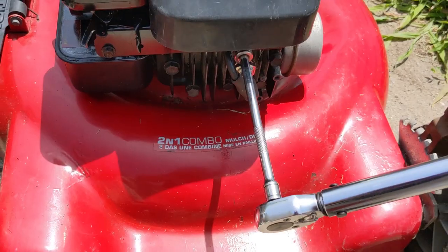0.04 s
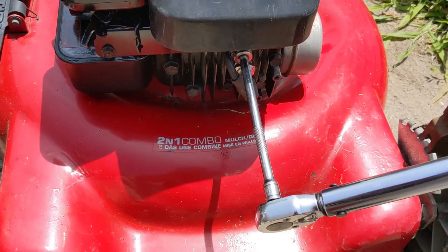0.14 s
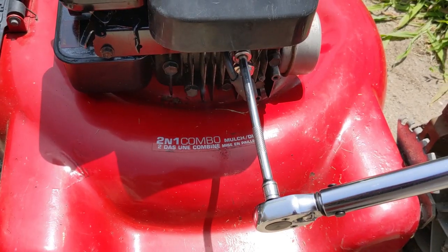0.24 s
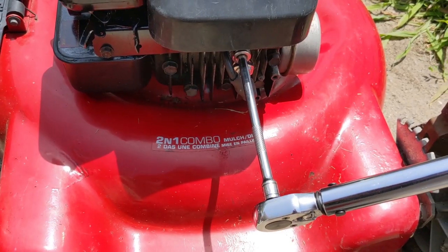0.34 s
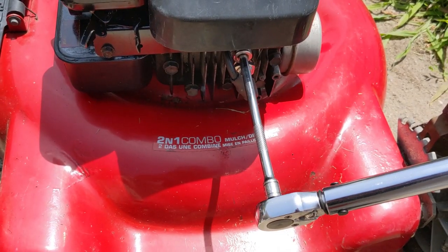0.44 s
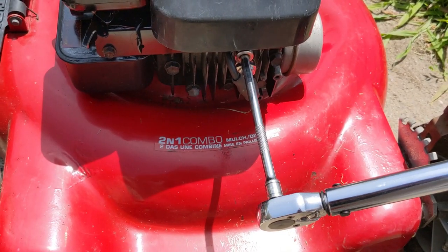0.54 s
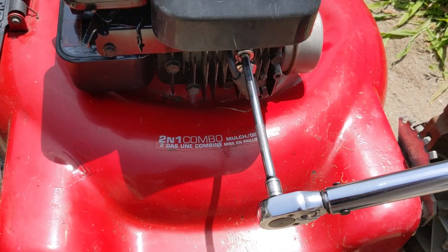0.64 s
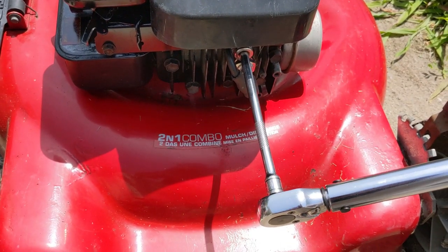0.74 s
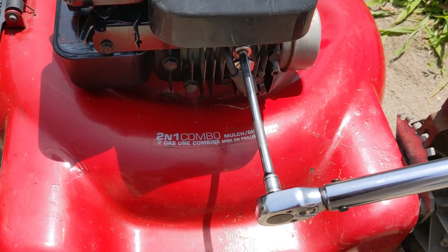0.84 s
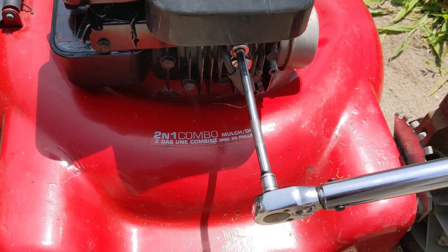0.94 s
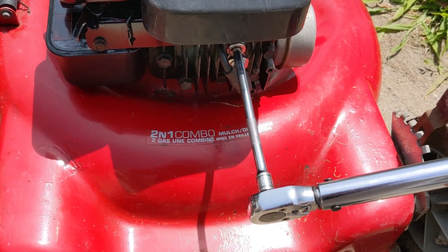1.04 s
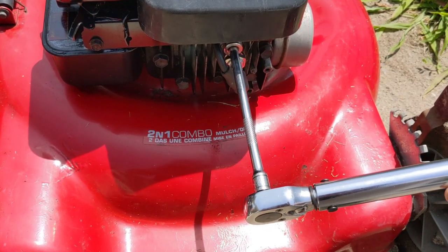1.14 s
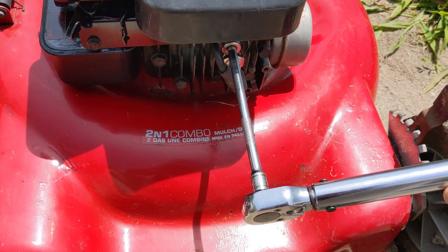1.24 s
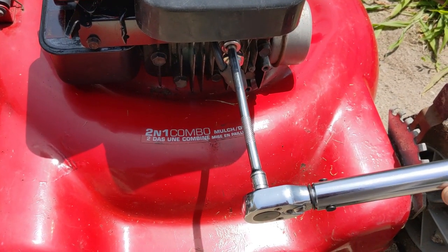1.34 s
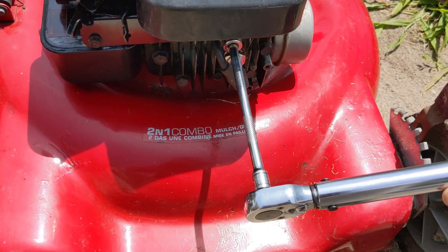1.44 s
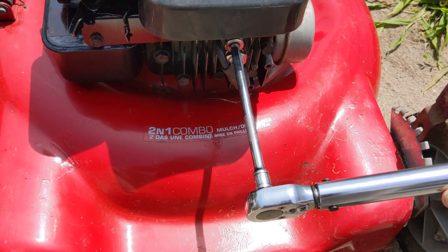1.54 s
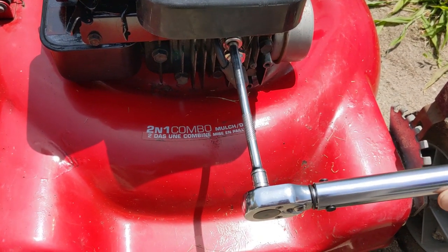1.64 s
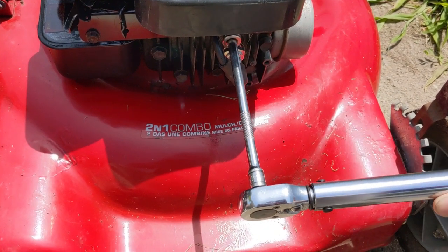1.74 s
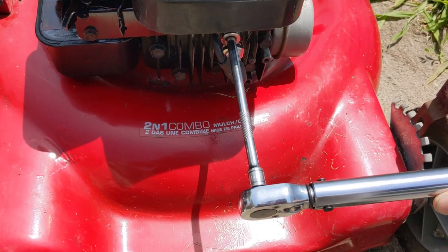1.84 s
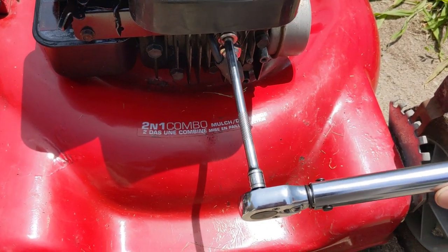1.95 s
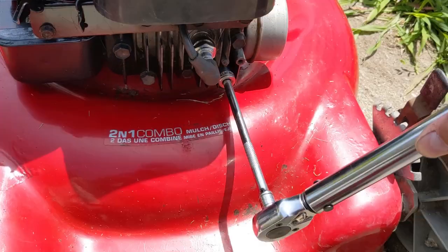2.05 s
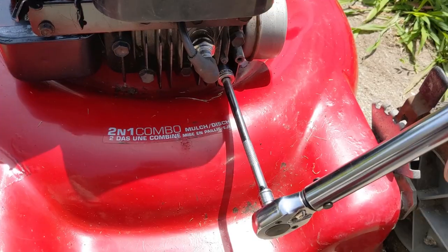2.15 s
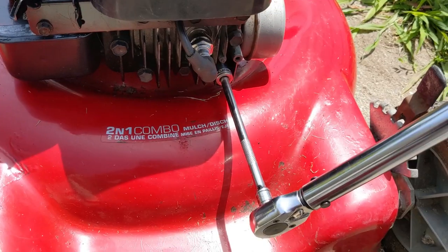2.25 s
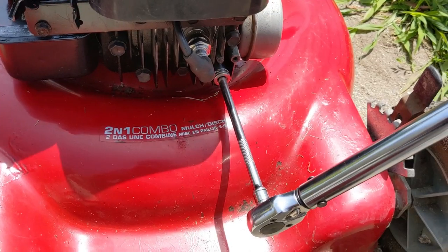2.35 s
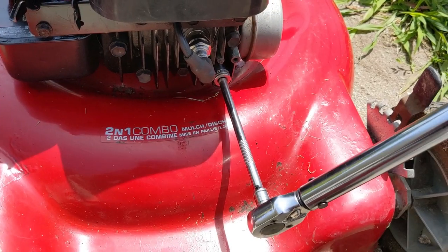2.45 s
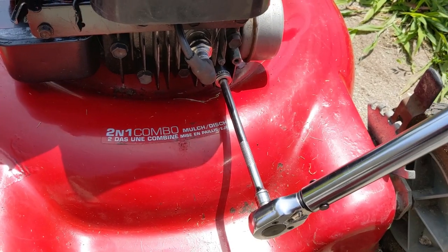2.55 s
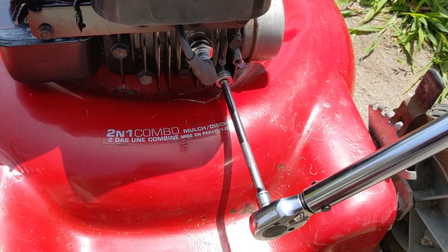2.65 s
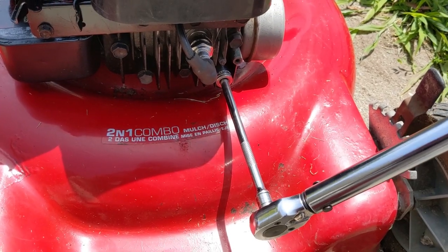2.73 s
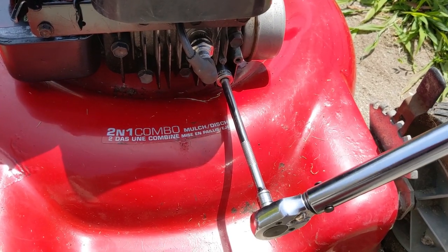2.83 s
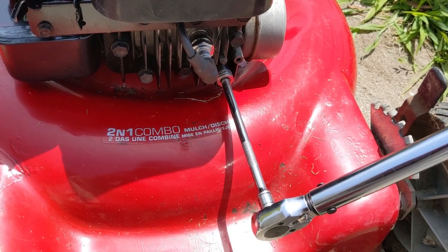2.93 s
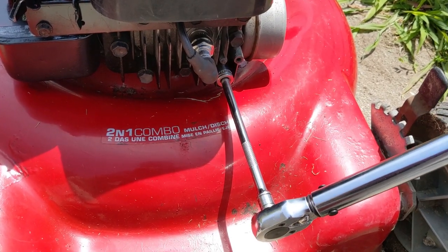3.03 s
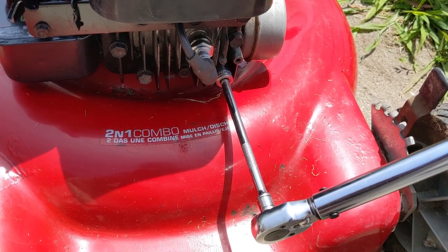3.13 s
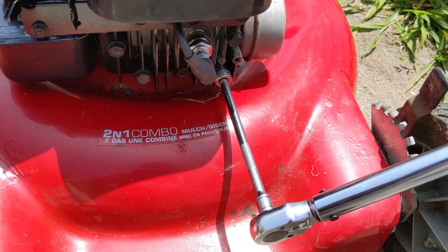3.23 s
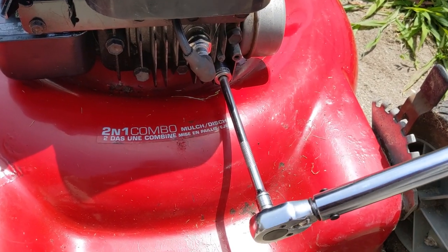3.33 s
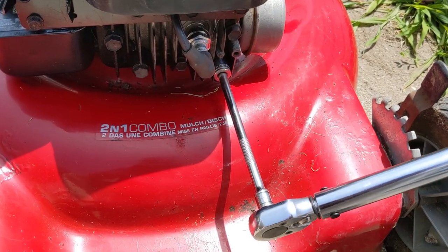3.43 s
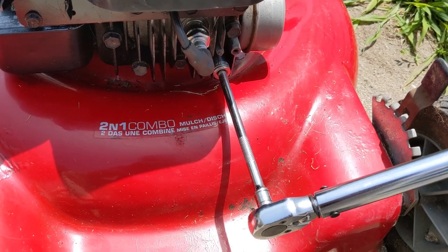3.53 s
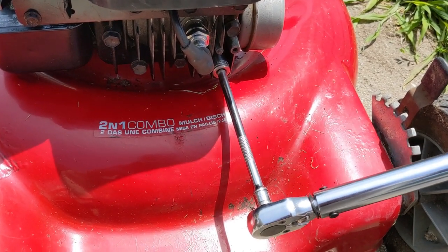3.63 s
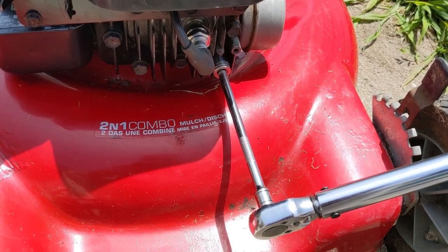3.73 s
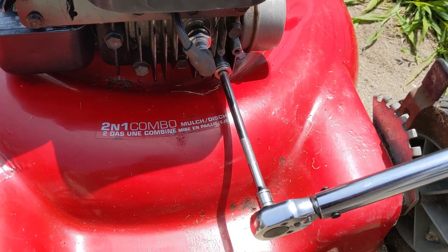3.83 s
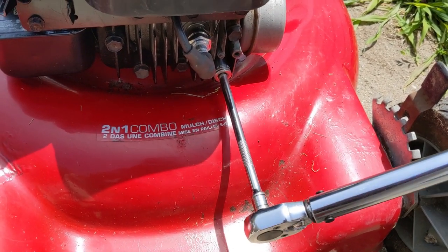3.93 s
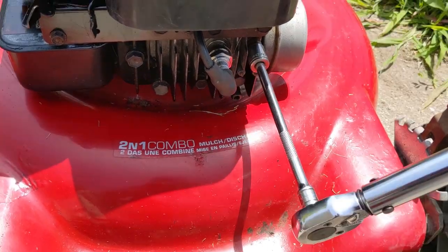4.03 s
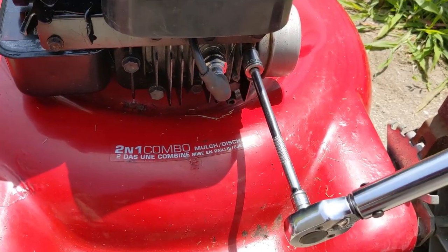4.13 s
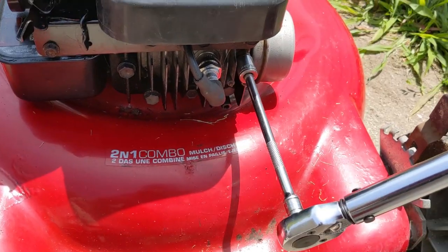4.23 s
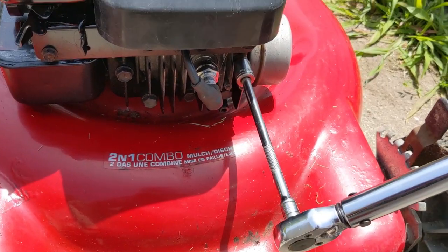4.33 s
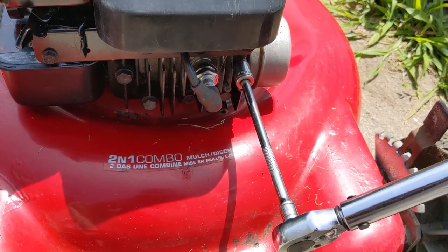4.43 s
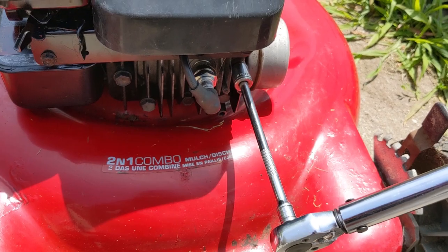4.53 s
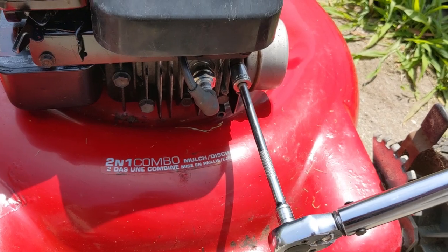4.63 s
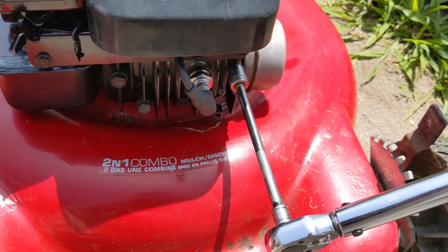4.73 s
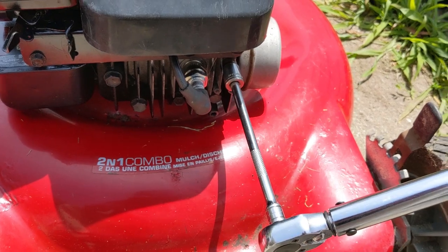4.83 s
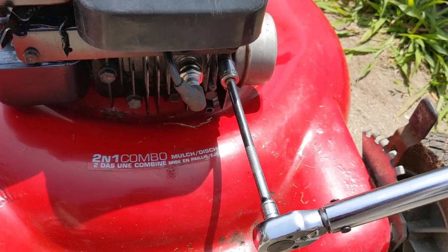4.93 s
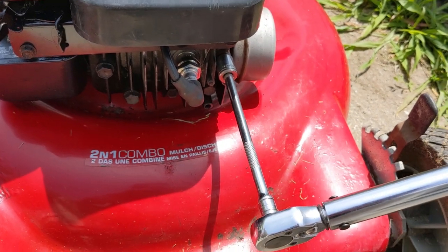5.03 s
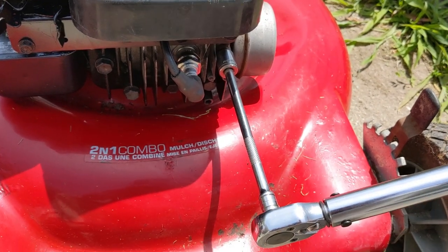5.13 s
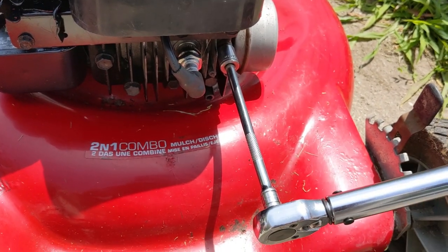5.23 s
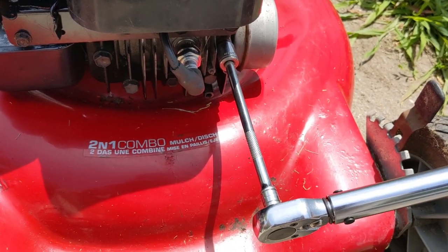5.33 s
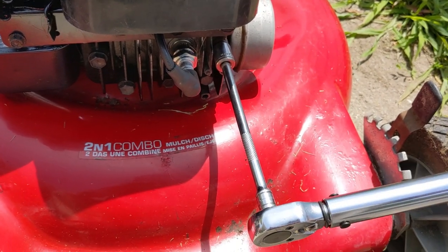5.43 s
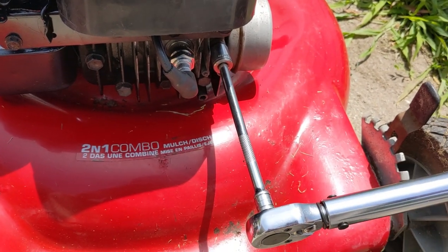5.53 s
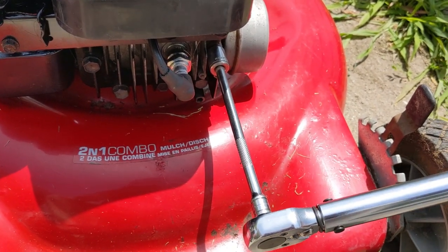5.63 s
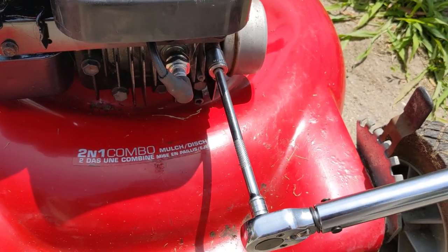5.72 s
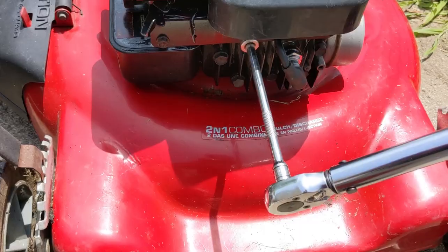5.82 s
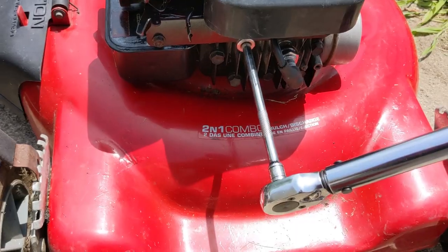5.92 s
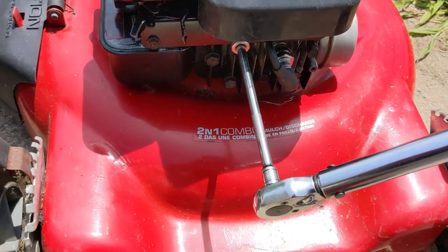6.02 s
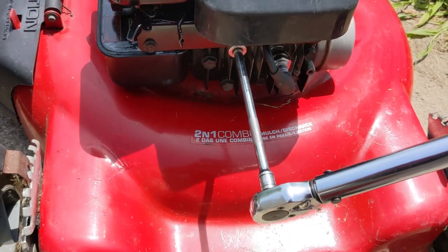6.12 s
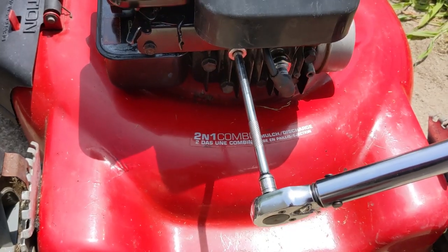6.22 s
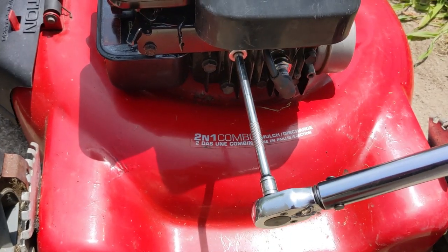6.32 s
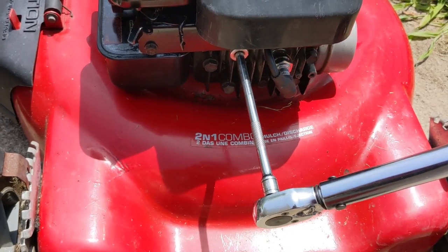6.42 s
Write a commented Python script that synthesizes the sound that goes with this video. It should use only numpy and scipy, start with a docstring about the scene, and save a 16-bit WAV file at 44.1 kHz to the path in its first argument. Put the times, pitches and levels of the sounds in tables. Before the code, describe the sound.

A torque wrench cracks and snaps back three times on a lawn mower engine, close up in a quiet garden with faint birds and low air rumble.

```python
"""Outdoors in a garden, close by, a click-type torque wrench tightens head bolts on a lawn mower engine. Three
times it breaks over with a steel crack and snaps back as the hand lets go. The cracks are noise bursts; the
wrench, fins and deck ring as sums of fading sine waves, and the easing mechanism scrapes in grainy noise. The
socket knocks as it takes up load, and more drily some time after a snap-back. Birds chirp in gliding sines over
a faint drone, soft noise and air puffs."""
import sys
import numpy as np
from scipy import signal
from scipy.fft import rfft, irfft, next_fast_len
from scipy.io import wavfile

SR = 44100
rng = np.random.default_rng(int(sys.argv[2]) if len(sys.argv) > 2 else 0)


def digitize_waveform(pressure):
    """Quantize a signal to 16-bit integers and store it at the path in sys.argv[1].

    Rows of a 2-D input are taken as channels; values are limited to [-1, 1].
    """
    field = np.atleast_2d(pressure).T
    bounded = np.clip(field, -1, 1)
    quanta = np.round(bounded * 32767).astype(np.int16)
    wavfile.write(sys.argv[1], SR, quanta)


N = 285327

# The wrench breaks over, and snaps back: (time [s], crack [dB], ring [dB], tube [dB], after-ring [dB],
# crack brightness [dB per octave], overtone [dB])
BREAK_OVERS = [(1.5556, -6.5, -3, -2, -25, 2.6, -25.5), (3.4882, -8, 1.5, 3, -26.5, -0.5, -14),
               (5.3409, -9, -2, -7, -26, 0.2, -24.5)]
SNAP_BACKS = [(1.7819, -8.5, -4.5, -3, -23.5, -0.5, -22.5), (3.7252, -11, -0.5, 4.5, -24.5, 0.56, -14),
              (5.5843, -9, -1, -4, -25, 0.5, -23)]
# Crowded, quickly fading modes at each blow: (frequency [Hz], level [dB per Hz])
BREAK_CRACK_COLOUR = [(30, -44), (110, -6.5), (430, -25), (650, -0.5), (900, -14), (1400, -1),
                      (1700, -13.5), (2100, -3.5), (2700, -2), (3300, -1), (4150, -11.5), (5200, -4),
                      (6000, 0), (6900, -8.5), (8300, -7.5), (9450, -0.5), (10200, -15.5), (12500, -9),
                      (13300, -18.5), (15200, -14), (16000, -26)]
SNAP_CRACK_COLOUR = [(30, -41.5), (150, -15), (400, -23), (540, 1), (900, -4), (1400, 2), (1800, -6),
                     (3300, 1.5), (4100, 0.5), (5200, 2), (6200, -9), (7200, -3), (8000, -8), (8600, -3),
                     (9300, -5.5), (10900, -11.5), (12500, -2), (13600, -17.5), (16000, -26)]
CRACK_RISE_S = .0005
# Clear tones of wrench, extension bar, fins and deck, then the tube's own heavily damped tones:
# (frequency [Hz], time to fall 60 dB [s], level at break-over [dB], level at snap-back [dB])
STEEL_MODES = [(256, 0.6, -34, -45), (398, 0.6, -40, -45), (522, 0.35, -42, -43), (563, 0.32, -30, -45),
               (595, 0.6, -45, -52), (627, 0.3, -27, -38), (711, 0.22, -22, -36), (762, 0.6, -50, -47),
               (816, 0.26, -38, -30), (868, 0.26, -48, -33), (995, 0.38, -33, -28), (1074, 0.6, -47, -51),
               (1112, 0.6, -52, -43), (1140, 0.6, -38, -55), (1230, 0.57, -60, -47), (1342, 0.28, -40, -36),
               (1428, 0.26, -48, -36), (1497, 0.6, -49, -46), (1747, 0.27, -39, -39),
               (1885, 0.33, -34, -39), (2105, 0.26, -53, -34), (2379, 0.6, -44, -50),
               (2413, 0.41, -44, -34), (2441, 0.54, -52, -45), (2632, 0.34, -43, -50),
               (2680, 0.28, -30, -37), (2864, 0.6, -50, -46), (2926, 0.37, -51, -36),
               (3095, 0.26, -48, -29), (3186, 0.25, -40, -39), (3320, 0.26, -53, -36),
               (3435, 0.26, -42, -35), (3510, 0.36, -45, -51), (3566, 0.6, -51, -45),
               (3628, 0.52, -44, -43), (3880, 0.46, -62, -43), (4180, 0.26, -55, -38),
               (4261, 0.6, -50, -48), (4465, 0.6, -49, -50), (4683, 0.24, -45, -39), (4757, 0.26, -50, -46),
               (5290, 0.26, -49, -41), (5450, 0.41, -56, -63), (6301, 0.6, -64, -58), (6950, 0.6, -62, -54),
               (8734, 0.27, -47, -56), (9006, 0.46, -58, -63), (9854, 0.32, -59, -58)]
TUBE_MODES = [(657, 0.1, -23.5, -36), (2710, .06, -18, -31.5), (2660, 0.07, -18, -33.5),
              (2734, 0.087, -17, -32), (4500, 0.08, -28, -27), (5090, 0.09, -38.5, -26.5),
              (8820, 0.035, -29.5, -16.5), (12600, 0.023, -27, -25)]
# The tube's sharp overtone, strong when the pawl (the catch inside the wrench) lands squarely:
# (frequency [Hz], time to fall 60 dB [s], level [dB])
OVERTONE_MODES = [(4610, .07, -0.5), (4790, 0.092, -11)]
# The extension bar sings on thinly after every click: (frequency [Hz], time to fall 60 dB [s], level [dB])
BAR_MODES = [(1890, .7, -46), (3590, .8, -46), (4270, .9, -52), (4490, 1, -49), (5480, .45, -50),
             (7000, .55, -52)]
BAR_FOLLOWS = .4   # share of the overtone's dB setting that the bar follows
# The sliding mechanism chokes the clear tones: start after a snap-back, and the extra 60 dB fall time
CHOKE_AFTER_S, CHOKE_T60_S = 0.1, 0.65
DETUNE = .003   # the changing load shifts each tone: spread as a share of its pitch
# A weaker twin close to each tone makes it beat: its strength, and its largest distance in the treble
TWIN_SHARE, TWIN_SPLIT_LIMIT_HZ = .45, 19.5
# Long after-ring of many weak tones: (frequency [Hz], at break-over [dB per Hz], at snap-back [dB per Hz])
AFTER_RING_COLOUR = [(150.8, -13, -3), (293, -11.5, -6), (420, -15.5, -5), (620, -5, 0), (1100, -4, -0.5),
                     (1440, -11.5, 0.5), (1650, -17.5, -10), (1930, -10, -4), (2500, -4.5, -2.5),
                     (3380, -5.5, 2.5), (4300, -13.5, -5), (5000, -19, -14.5), (5600, -14.5, -13.5),
                     (6000, -20, -17.5), (6400, -19.5, -16), (8040, -23.5, -17.5), (9600, -18.5, -16),
                     (10700, -27, -22), (12060, -19.5, -20.5), (13955, -29, -26)]
# How fast it dies away: (frequency [Hz], time to fall 60 dB [s])
AFTER_RING_T60 = [(150, 0.81), (350, 0.74), (700, 0.45), (1500, 0.38), (3000, 0.29), (4500, 0.37),
                  (7000, 0.41), (14000, 0.28)]
FAVOUR_DB = 4.5   # every blow favours other weak tones: spread of their strengths before clipping
# The pawl bounces and lands again just after a blow: (time [s], crack [dB], tube [dB])
PAWL_REBOUNDS = [(1.5667, -23, -5), (1.577, -27, -9.5), (1.7888, -16, -15.5), (3.496, -20, -6.5),
                 (3.504, -25.5, -5.5), (5.3505, -20, -19), (5.3562, -24.5, -7.5)]
# The mechanism slips as the load eases after a snap-back, brightly or with a clack or duller drag:
# (time [s], length [s], hiss [dB], brightness [dB per octave], ring [dB])
SLIP_EVENTS = [(1.876, 0.016, -31, 2, -35.5), (1.8936, 0.0061, -28.5, -2, -31),
               (1.904, 0.0087, -43, -8.5, -42.5), (3.798, 0.0058, -37, -2, -34),
               (3.806, 0.018, -30.5, -1.5, -38), (3.832, 0.0075, -33, -6.5, -39),
               (5.7055, 0.0016, -26.5, -0.5, -32.5), (5.724, 0.012, -37.5, -6.5, -42)]
# Colour of the scraping hiss: (frequency [Hz], level [dB per Hz])
SLIP_HISS_COLOUR = [(500, -38), (1500, -6), (3000, 0), (4800, -1), (7000, -3.5), (8200, 0.5), (9600, 8.5),
                    (10700, -1), (11600, 8), (13200, 4), (16000, -19)]
# The scraped tube rings on, damped by the contact: (frequency [Hz], time to fall 60 dB [s], level [dB])
SLIP_MODES = [(2130, .03, -4), (2300, .025, -3), (2450, .025, -4), (2700, .025, -4), (2887, .03, -1),
              (3080, .025, -2), (3280, .025, -2), (3920, .022, -6), (4200, .02, -7), (5650, .018, -2),
              (6030, .016, -5), (7080, .02, 2), (9600, .012, 0), (9970, .012, -1), (11500, .018, 3)]
SLIP_GRAIN_DB, CATCHES_PER_S = 4.2, 280   # roughness of the hiss; tiny catches within a slip
# Sliding steel makes single tones squeak: (time [s], length [s], frequency [Hz], level [dB])
SQUEAK_EVENTS = [(1.8, 0.037, 3400, -33), (1.808, .058, 2410, -39.5), (1.826, 0.05, 2116, -38),
                 (3.742, 0.078, 996, -30.5), (5.605, 0.093, 994, -30.5), (5.702, 0.044, 11500, -43.5)]
SQUEAK_ROUGH = .006   # share of the pitch
# The socket knocks on the bolt head, first with a bounce: (time [s], contact [dB], ring [dB], clink [dB])
SOCKET_KNOCKS = [(0.873, -28.5, -35, -56), (0.8795, -44, -34, -54), (2.094, -48, -69, -70),
                 (3.3, -26, -36, -36), (4.057, -47.5, -71, -65), (5.174, -29, -40, -49.5),
                 (6.388, -36.5, -44, -65)]
# Dull noise of the contact: (frequency [Hz], level [dB per Hz])
KNOCK_COLOUR = [(300, -16), (750, 1.5), (1400, -0.5), (2000, -13), (3500, -3.5), (5500, -13.5), (9500, -12),
                (12000, -25), (16000, -41)]
KNOCK_AFTER_RING_DB = -10   # relative to the contact
# The socket's short, bright clink: (frequency [Hz], time to fall 60 dB [s], level [dB])
SOCKET_MODES = [(2480, .07, -4), (2640, .06, -1), (2830, .07, -3), (2990, .05, -7), (3930, .08, -5),
                (6250, .04, -8)]
# Cylinder head, before the hand damps it: (frequency [Hz], time to fall 60 dB [s], level [dB])
HEAD_MODES = [(525, .16, -11), (712, .06, 7), (867, .14, 4), (945, .2, 0), (1003, .4, 2), (1120, .21, -7),
              (1420, .3, -13), (1846, .12, -19), (2415, .15, -12), (2680, .22, -14), (3494, .2, -19),
              (3895, .22, -15), (6900, .3, -23)]
# Dry little ticks of the loaded tool: (time [s], level [dB])
TOOL_TICKS = [(1.08, -46.5), (4.884, -48), (4.918, -42), (4.9478, -31.5), (5.114, -47.5), (5.321, -39.5)]
# Their colour: (frequency [Hz], level [dB per Hz])
TICK_NOISE_COLOUR = [(500, -32), (1400, 11), (2600, 9), (4500, 2.5), (8000, -6), (16000, -25)]
# The engine block answers with a loose, lingering thud: one (level [dB]) for each of the three pulls
BLOCK_THUDS_DB = [-31.5, -26.5, -30]
THUD_LAG_S, THUD_RISE_S, THUD_T60_S = 0.0037, 0.006, .26
# Colour of the thud: (frequency [Hz], level [dB per Hz])
BLOCK_THUD_COLOUR = [(100, -30.5), (260, -9), (420, -11), (540, -1.5), (640, 5.5), (740, 1), (900, -13),
                     (1100, -8), (1500, -29), (4000, -59.5)]
# The slack handle bumps against its joint: (time [s], level [dB])
HANDLE_BUMPS = [(3.943, -46.5), (4.055, -45.5)]
# Colour of the bump: (frequency [Hz], level [dB per Hz])
HANDLE_BUMP_COLOUR = [(200, -16), (520, 5.5), (1000, -7), (1650, 2.5), (2200, -14), (3200, -19),
                      (8000, -22.5)]
# The mower starts to rock on its deck: (time [s], first jolt [dB], hum [dB])
DECK_SHUDDERS = [(1.647, -63, -35), (1.903, -41, -42.5), (3.536, -31.5, -53), (3.85, -36, -42),
                 (3.945, -46, -55), (5.659, -33.5, -34.5)]
# Colour of each jolt: (frequency [Hz], level [dB per Hz])
DECK_JOLT_COLOUR = [(30, -45.5), (120, -10.5), (260, 9.5), (340, -5.5), (520, 3), (800, -1.5), (1300, -10),
                    (3000, -21), (8000, -46.5)]
# Hollow hum of the deck: (frequency [Hz], time to fall 60 dB [s], level [dB])
DECK_MODES = [(255, .6, 0), (398, .7, -11), (595, .35, -11)]
ROCK_PERIOD_S, ROCK_LOSS_DB = .078, 11.5   # it comes down again and again, weaker each time
# A bird's short falling chirps: (time [s], length [s], start pitch [Hz], level [dB], garden scatter [dB])
BIRD_CHIRPS = [(0.002, 0.044, 2800, -60, -1), (0.817, 0.028, 3160, -47.5, -6), (2.456, 0.041, 4050, -63, 4),
               (4.241, 0.058, 4080, -56.5, 1.5), (6.321, 0.037, 3995, -58.5, 2.5)]
CHIRP_DROP, CHIRP_ROUGH = 0.325, 0.061   # final fall and roughness as shares of the pitch
# Another bird's thin whistle sinks and lifts again: (time [s], pitch [Hz], level before the gain [dB])
WHISTLE_PATH = [(2.638, 8600, -78), (2.648, 9000, -72), (2.714, 7400, -60), (2.726, 7600, -65),
                (2.818, 6660, -72.5), (2.874, 7500, -74), (2.92, 7397, -66)]
WHISTLE_GAIN_DB, WHISTLE_ROUGH = 1, 0.03   # roughness as a share of the pitch
# Low rumble and soft hiss of the garden air: (frequency [Hz], level [dB per Hz])
RUMBLE_COLOUR = [(12, -68), (20, -37), (37, -12), (70, -0.5), (119, -11), (173, -8), (236, -11),
                 (287, -15.5), (353, -21.5), (380, -21.5), (410, -23), (586, -27.5), (700, -37),
                 (910, -59.5), (1540, -120)]
HISS_COLOUR = [(350, -21.5), (600, -1), (688, -8), (1110, -3.5), (1210, -3), (1290, -6), (2150, -11),
               (2340, -8.5), (2950, -12), (3830, -12.5), (4160, -9.5), (4520, -14), (6730, -13),
               (12800, -25), (14000, -31.5), (16000, -38.5)]
RUMBLE_DB, HISS_DB = -47, -62
# Distant drone and thin steady whines: (frequency [Hz], level [dB])
DRONE_TONES = [(80, -58), (113, -55), (352, -68), (2430, -79), (4188, -75), (4893, -86), (6724, -87)]
# Puffs of air on the microphone: (time of the peak [s], spread [s], level [dB])
AIR_PUFFS = [(.07, 0.071, -42.5), (.36, 0.026, -28.5), (.46, .025, -36), (2.53, 0.019, -38.5),
             (3.181, 0.012, -32.5), (3.315, 0.041, -25.5), (3.597, 0.025, -23), (5.625, 0.013, -35)]
# Colour of the puffs: (frequency [Hz], level [dB per Hz])
PUFF_COLOUR = [(10, -69), (25, -28.5), (45, 5), (65, 5.5), (120, -1), (190, -12.5), (300, -29),
               (800, -67.5)]
# Each click also jolts the hand that holds the microphone: one (level [dB]) for each of the three pulls
HAND_JOLTS_DB = [-47.5, -30, -30]
JOLT_LAG_S, JOLT_SPREAD_S, SNAP_JOLT_DB = 0.029, 0.038, -4.5   # the snap-back jolts a little less
# How alike left and right are, for tool, air and puffs: (frequency [Hz], likeness [-1 to 1])
TOOL_ALIKE = [(200, 0.65), (500, 1), (800, 0.8), (1200, 0.11), (2000, 0.04), (5000, 0), (12000, 0)]
AIR_ALIKE = [(40, 0.99), (100, 0.91), (250, 0), (600, 0.69), (2000, 0), (10000, 0)]
PUFF_ALIKE = [(30, -0.0098), (70, -0.39), (200, 0.44)]
# How much louder left is than right, for tool and air: (frequency [Hz], difference [dB])
TOOL_LEFT_RIGHT = [(200, .5), (500, 1.5), (1400, 2), (2600, 3), (4200, -1), (5500, 5.5), (7300, 4.5),
                   (8700, -9), (10500, -5.5), (12300, -7), (16000, 0)]
AIR_LEFT_RIGHT = [(40, 5), (120, -0.6), (500, 0), (4000, 3.5), (12000, -1)]
SIDES = np.array([[1], [-1]])   # left, right
TOP_CUT_HZ = 17100   # from here up, everything is at least 60 dB down


def from_db(db):
    """Turn decibels into a gain."""
    return np.exp(np.asarray(db) * float(np.log(10) / 20))


def rms_one(x):
    """Scale to an average strength (rms) of 1."""
    return x / np.sqrt(np.mean(x ** 2) + 1e-20)


def at_hz(points, hz):
    """Read a table between its points, along log frequency."""
    known_hz, values = np.transpose(points)
    return np.interp(np.log(np.maximum(hz, 1)), np.log(known_hz), values)


def seconds(size):
    """Time of each sample."""
    return np.arange(size) / SR


def add(out, s, sound):
    """Mix a sound in at a given time."""
    start = max(round(s * SR), 0)
    out[:, start:start + sound.shape[-1]] += sound[..., :N - start]


def left_and_right(mid, side, likeness, hz):
    """Blend two independent signals so that left and right are as alike as the table says."""
    alike = np.clip(at_hz(likeness, hz), -1, 1)
    return np.sqrt(1 + alike) * mid + SIDES * np.sqrt(1 - alike) * side


def noise(colour, size, tilt_db=0, likeness=TOOL_ALIKE, balance=TOOL_LEFT_RIGHT):
    """Stereo noise, shaped frequency by frequency to a given colour; rms 1."""
    padded = next_fast_len(size, True)
    hz = np.fft.rfftfreq(padded, 1 / SR)
    mid, side = rfft(rng.standard_normal((2, padded)))
    pair = left_and_right(mid, side, likeness, hz)
    ports = from_db(SIDES * at_hz(balance, hz) / 2)
    ports = ports / np.hypot(*ports)
    gain = from_db(at_hz(colour, hz) + tilt_db * np.log2(hz + 1)) * ports
    return rms_one(irfft(pair * gain, padded)[:, :size])


def wander(rate_hz, size, count=12):
    """Smooth random motion of spread 1, drawn at `count` points a cycle."""
    at = seconds(size) * rate_hz * count
    points = next_fast_len(int(at[-1]) + 2, True)
    cycles = np.fft.rfftfreq(points, 1 / count)
    slow = irfft(rfft(rng.standard_normal(points)) / (1 + cycles ** 2), points)
    return np.interp(at, np.arange(points), rms_one(slow))


def strike(t, rise, t60, hold=0):
    """Loudness curve that swells, holds while the contact lasts and falls by 60 dB in t60."""
    fall = from_db(-60 * np.maximum(t - hold, 0) / t60)
    return (1 - np.exp(-t / max(rise, 1e-5))) * fall


def glide(pitch):
    """Sine wave that follows a changing pitch."""
    return np.sin(2 * np.pi * np.cumsum(pitch) / SR)


def steel_ring(modes, size, scatter_db=2.2, in_step_hz=1300, swell_cycles=2.2):
    """Each blow excites every pair of modes anew; low modes swell slowest, high ones reach the ports out of step."""
    t, out = seconds(size).astype("f"), 0
    for rest_hz, t60, db in modes:
        hz = rest_hz * (1 + DETUNE * rng.normal())
        twin_hz = hz + TWIN_SPLIT_LIMIT_HZ * rng.uniform(-1, 1) * min(hz / in_step_hz, 1)
        port_phase = rng.normal(0, 1, (2, 1)) * min((hz / in_step_hz) ** 2 / 2, 2)
        phase = (rng.uniform(0, 2 * np.pi) + port_phase).astype("f")
        level = db + scatter_db * rng.normal() + at_hz(TOOL_LEFT_RIGHT, hz) * SIDES / 2
        twin = TWIN_SHARE * np.cos(2 * np.pi * twin_hz * t + phase)
        pair = np.sin(2 * np.pi * hz * t + phase) + twin
        gain = from_db(level) / np.hypot(1, TWIN_SHARE)
        out = out + gain * pair * strike(t, swell_cycles / hz, t60)
    return out


def weak_modes(size, count=400):
    """The body's many weak modes, crowding less toward the treble: pitches and freely fading waves."""
    lowest, highest = np.sqrt(AFTER_RING_COLOUR[0][0]), np.sqrt(AFTER_RING_COLOUR[-1][0])
    hz = (np.linspace(lowest, highest, count) + rng.uniform(-.13, .13, count)) ** 2
    t = seconds(size).astype("f")
    decay_rate = (-np.log(1000) / at_hz(AFTER_RING_T60, hz))[:, None].astype("f")
    decay = np.exp(decay_rate * t)
    turn = (2 * np.pi * hz)[:, None].astype("f") * t
    return hz, decay * np.sin(turn), decay * np.cos(turn)


def after_ring(body, place, tilt_db=0):
    """A blow gives each weak mode a fresh strength and phase; rms about 1 before the swell and decay."""
    hz, sines, cosines = body
    colour = [(row[0], row[1 + place]) for row in AFTER_RING_COLOUR]
    # the fourth root makes up for the wider spacing of high modes
    gain = from_db(at_hz(colour, hz)) * np.sqrt(np.sqrt(hz))
    gain = gain * from_db(FAVOUR_DB * np.clip(rng.normal(size=len(hz)), -2, 2))
    mid, side = rng.standard_normal((2, 2, 1, len(hz)))
    weight = left_and_right(mid, side, TOOL_ALIKE, hz) * gain
    # left and right differ slightly more here than the table says
    weight = weight * from_db(tilt_db * np.log2(hz) + 0.58 * SIDES * at_hz(TOOL_LEFT_RIGHT, hz))
    weight = (2 * weight / np.linalg.norm(weight)).astype("f")
    swell = 1 - np.exp(-seconds(sines.shape[1]) / 0.0068)
    return (weight[0] @ sines + weight[1] @ cosines) * swell


def clicks(blows, colour, body, crack_t60, hold, place, free_s, clatter_db=2.0, rattle_db=1.05):
    """The pawl tips over and hits the tube: a clattering crack, then clear modes and a dense after-ring."""
    out, t = np.zeros((2, N)), seconds(body[-1].shape[1])
    steel = [(hz, t60, dbs[place]) for hz, t60, *dbs in STEEL_MODES]
    tube = [(hz, t60, dbs[place]) for hz, t60, *dbs in TUBE_MODES]
    for s, crack_db, ring_db, tube_db, tail_db, tilt_db, overtone_db in blows:
        clatter = from_db(clatter_db * wander(500, len(t)))
        crack = rms_one(noise(colour, len(t), tilt_db) * clatter)
        # the treble of the crack is damped sooner than its lower part
        low = signal.sosfilt(signal.butter(1, 4500, fs=SR, output="sos"), crack)
        high = crack - low
        crack = (low * strike(t, CRACK_RISE_S, crack_t60, hold)
                 + high * strike(t, CRACK_RISE_S, crack_t60 / 2, hold))
        rings = from_db(ring_db) * steel_ring(steel, len(t))
        rings = rings + from_db(tube_db) * steel_ring(tube, len(t))
        rings = rings + from_db(overtone_db) * steel_ring(OVERTONE_MODES, len(t))
        rings = rings * from_db(-60 * np.maximum(t - free_s, 0) / CHOKE_T60_S)
        # the bar is added after the choking, so it sings on freely
        rings = rings + from_db(BAR_FOLLOWS * overtone_db) * steel_ring(BAR_MODES, len(t))
        # loose joints make the after-ring shiver
        shiver = from_db(tail_db + rattle_db * wander(60, len(t)))
        add(out, s, from_db(crack_db) * crack + rings + shiver * after_ring(body, place))
    return out


def wrench(body):
    """Break-over and snap-back strike the same steel at different places."""
    break_overs = clicks(BREAK_OVERS, BREAK_CRACK_COLOUR, body,
                         crack_t60=0.046, hold=0.0016, place=0, free_s=np.inf)
    snap_backs = clicks(SNAP_BACKS, SNAP_CRACK_COLOUR, body,
                        crack_t60=0.063, hold=0.0032, place=1, free_s=CHOKE_AFTER_S)
    return break_overs + snap_backs


def rebounds(crack_t60=0.013):
    """The pawl lands again: smaller, drier cracks that set the tube ringing anew."""
    out, t = np.zeros((2, N)), seconds(size=6000)
    tube = [row[:3] for row in TUBE_MODES]   # levels as at break-over
    for s, crack_db, tube_db in PAWL_REBOUNDS:
        crack = noise(BREAK_CRACK_COLOUR, len(t)) * strike(t, CRACK_RISE_S / 2, crack_t60)
        add(out, s, from_db(crack_db) * crack + from_db(tube_db) * steel_ring(tube, len(t)))
    return out


def slips(wash_db=-23):
    """Steel drags over steel in a jerk: a scraping hiss, and tiny catches that each set the tube ringing."""
    out, t = np.zeros((2, N)), seconds(size=9000)
    for s, length, db, tilt_db, ring_db in SLIP_EVENTS:
        contact = strike(t, 0.00057, 0.03, length)
        grain = rms_one(from_db(SLIP_GRAIN_DB * wander(400, len(t))))
        wash = from_db(wash_db) * strike(t, .005, 0.22, length)   # fainter hiss that lingers
        hiss = (grain * contact + wash) * noise(SLIP_HISS_COLOUR, len(t), tilt_db)
        catches = rng.standard_normal((1, len(t))) * (rng.random(len(t)) < CATCHES_PER_S / SR)
        modes = [(hz, t60, mode_db + tilt_db * np.log2(hz / 4096)) for hz, t60, mode_db in SLIP_MODES]
        tube = steel_ring(modes, len(t))
        tube = tube * np.sqrt(2) / np.linalg.norm(tube)
        rings = signal.fftconvolve(rms_one(catches) * contact, tube, axes=1)
        add(out, s, from_db(db) * hiss + from_db(ring_db) * rings[:, :len(t)])
    return out


def squeaks():
    """While the mechanism slides, friction feeds one mode, which swells and stops."""
    out = np.zeros((2, N))
    for s, length, hz, db in SQUEAK_EVENTS:
        size = int(length * SR)
        pitch = hz * (1 + SQUEAK_ROUGH * wander(200, size))
        ports = from_db(db + at_hz(TOOL_LEFT_RIGHT, hz) * SIDES / 2)
        add(out, s, ports * signal.windows.tukey(size, .5) * glide(pitch))
    return out


def socket(body, tail_tilt_db=-4.0, damping_t60=0.47):
    """Play in the socket closes with a dull knock, its ring damped by the hand; the loaded joints tick."""
    out, t = np.zeros((2, N)), seconds(size=14000)
    for s, contact_db, ring_db, clink_db in SOCKET_KNOCKS:
        contact = noise(KNOCK_COLOUR, len(t)) * strike(t, 0.0016, 0.033, 0.00087)
        head = steel_ring(HEAD_MODES, len(t)) * strike(t, 0.0026, damping_t60)
        tail = after_ring(body, 0, tail_tilt_db)[:, :len(t)] * strike(t, 0.00082, damping_t60)
        add(out, s, from_db(clink_db) * steel_ring(SOCKET_MODES, len(t)))
        add(out, s, from_db(contact_db) * contact)
        add(out, s, from_db(ring_db) * head)
        add(out, s, from_db(contact_db + KNOCK_AFTER_RING_DB) * tail)
    for s, db in TOOL_TICKS:
        add(out, s, from_db(db) * noise(TICK_NOISE_COLOUR, len(t)) * strike(t, .0001, 0.015))
    return out


def thuds():
    """Dull answers of the heavy parts: the block after each break-over, the handle as it goes slack."""
    out, t = np.zeros((2, N)), seconds(size=14000)
    for (s, *_), db in zip(BREAK_OVERS, BLOCK_THUDS_DB):
        thud = noise(BLOCK_THUD_COLOUR, len(t)) * strike(t, THUD_RISE_S, THUD_T60_S)
        add(out, s + THUD_LAG_S, from_db(db) * thud)
    for s, db in HANDLE_BUMPS:
        add(out, s, from_db(db) * noise(HANDLE_BUMP_COLOUR, len(t)) * strike(t, .002, 0.039, .009))
    return out


def deck(count=3):
    """Soft, hollow jolts of the sheet steel as the load comes off; it hums on while the mower rocks."""
    out, t = np.zeros((2, N)), seconds(size=18000)
    for s, db, hum_db in DECK_SHUDDERS:
        add(out, s, from_db(hum_db) * steel_ring(DECK_MODES, len(t)))
        for k in range(count):
            jolt = noise(DECK_JOLT_COLOUR, len(t)) * strike(t, 0.0088, 0.29, 0.006)
            add(out, s + k * ROCK_PERIOD_S, from_db(db - k * ROCK_LOSS_DB) * jolt)
    return out


def bird_call(pitch, rough, level, echo_db=-10):
    """A gliding, more or less raspy whistle, and its scatter from the garden."""
    pitch = pitch * (1 + rough * wander(500, len(pitch)))
    call = level * np.sqrt(2) * glide(pitch)
    t = seconds(size=9000)
    paths = rng.standard_normal((2, len(t))) * strike(t, 0.0026, 0.14)
    paths *= from_db(echo_db) / np.linalg.norm(paths[0])
    paths[:, 0] = 1   # the direct path
    return signal.fftconvolve(call[None], paths, axes=1)


def birds():
    """One bird repeats a falling chirp; another gives a single longer, high whistle: sines with moving pitch."""
    out = np.zeros((2, N))
    for s, length, start_hz, db, scatter_db in BIRD_CHIRPS:
        size = int(length * SR)
        pitch = start_hz * (1 - CHIRP_DROP * np.linspace(0, 1, size) ** 3)   # holds, then plunges
        level = from_db(db) * signal.windows.tukey(size, .7)
        add(out, s, bird_call(pitch, CHIRP_ROUGH, level, scatter_db))
    s, hz, db = np.transpose(WHISTLE_PATH)
    t = np.arange(s[0], s[-1], 1 / SR)
    level = from_db(WHISTLE_GAIN_DB + np.interp(t, s, db)) * signal.windows.tukey(len(t), .15)
    add(out, s[0], bird_call(np.interp(t, s, hz), WHISTLE_ROUGH, level))
    return out


def garden(waver=0.095):
    """Low rumble and soft hiss from noise, and a few tones that waver in pitch and level."""
    out = from_db(RUMBLE_DB) * noise(RUMBLE_COLOUR, N, 0, AIR_ALIKE, AIR_LEFT_RIGHT)
    out = out + from_db(HISS_DB) * noise(HISS_COLOUR, N, 0, AIR_ALIKE, AIR_LEFT_RIGHT)
    for hz, db in DRONE_TONES:
        pitch = hz * (1 + .012 * wander(60, N))
        swell = 1 + waver * wander(6, N)
        out = out + from_db(db) * np.sqrt(2) * swell * glide(pitch)
    return out


def buffeting():
    """Low puffs of noise on the microphone, from stray air and from the jolt of every click."""
    t, puffs = seconds(N), list(AIR_PUFFS)
    for (break_s, *_), (snap_s, *_), db in zip(BREAK_OVERS, SNAP_BACKS, HAND_JOLTS_DB):
        puffs.append((break_s + JOLT_LAG_S, JOLT_SPREAD_S, db))
        puffs.append((snap_s + JOLT_LAG_S, JOLT_SPREAD_S, db + SNAP_JOLT_DB))
    level = 0
    for s, spread, db in puffs:
        bell = np.exp(-np.minimum(((t - s) / spread) ** 2 / 2, 20))
        level = level + from_db(db) * bell
    return level * noise(PUFF_COLOUR, N, 0, PUFF_ALIKE, AIR_LEFT_RIGHT)


def scene():
    """Tool, mower, birds and garden together."""
    body = weak_modes(size=21000)
    tool = wrench(body) + rebounds() + slips() + squeaks() + socket(body)
    mower = thuds() + deck()
    return tool + mower + birds() + garden() + buffeting()


def record(dry):
    """The loudest peaks are rounded off and the top of the treble is cut."""
    ceiling = 1.2
    rounded = ceiling * np.tanh(dry / ceiling)
    return signal.sosfilt(signal.cheby2(14, 60, TOP_CUT_HZ, fs=SR, output="sos"), rounded)


dry = scene()
out = record(dry)
digitize_waveform(out)
```